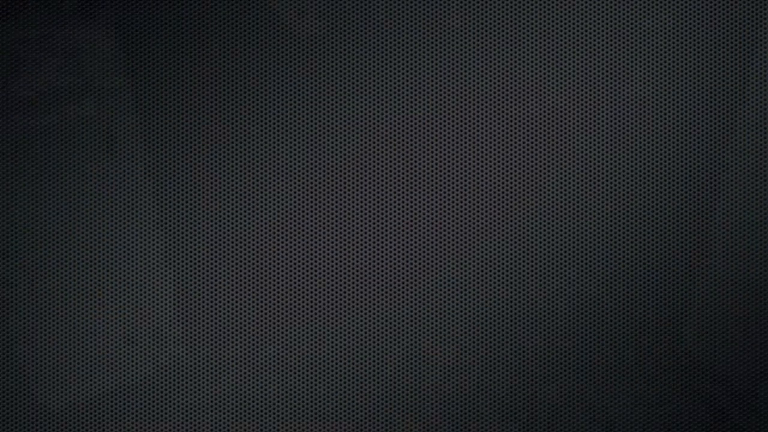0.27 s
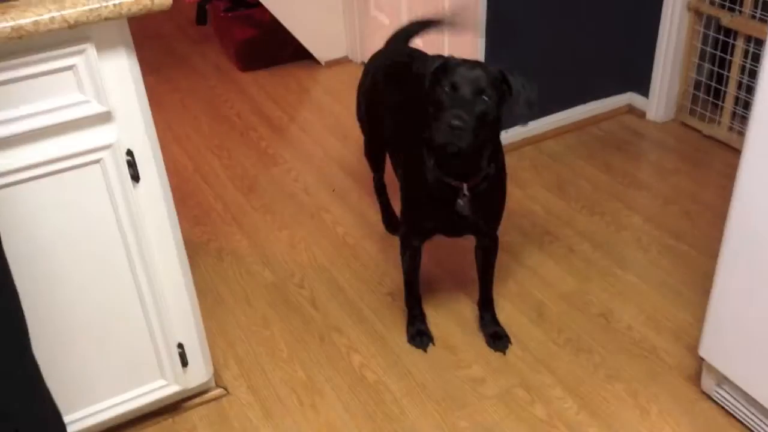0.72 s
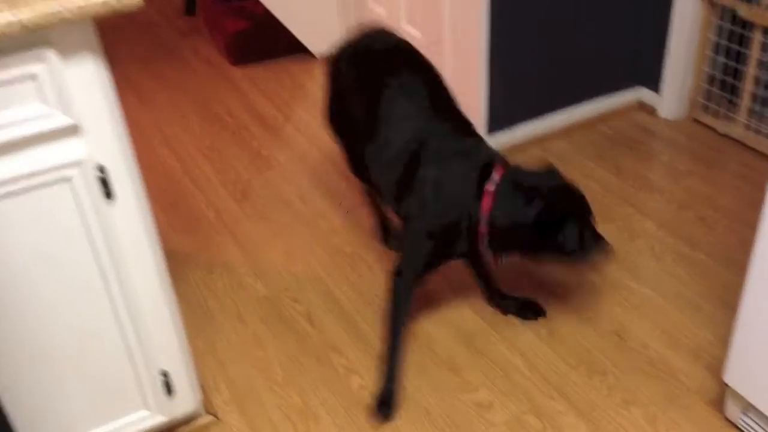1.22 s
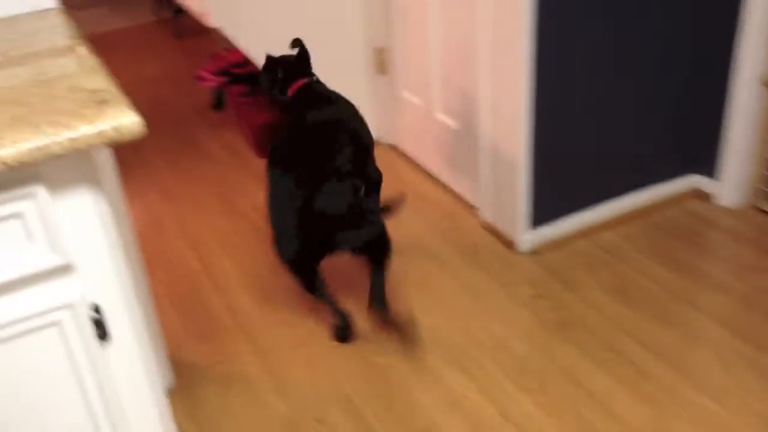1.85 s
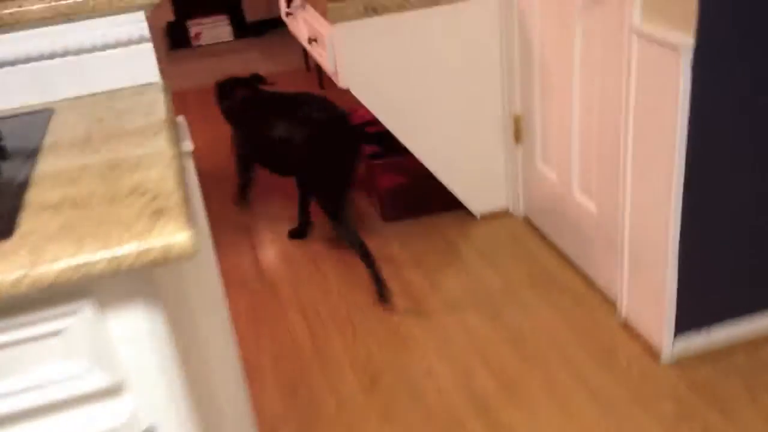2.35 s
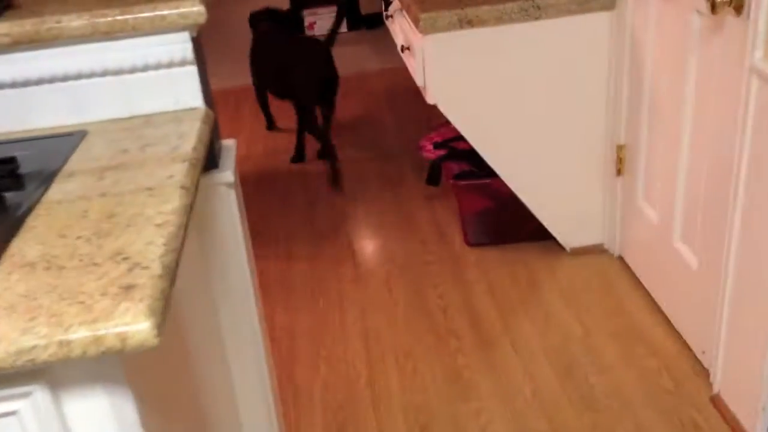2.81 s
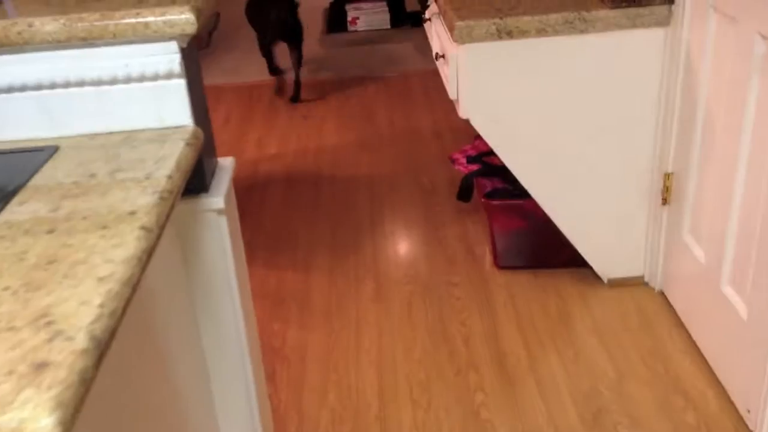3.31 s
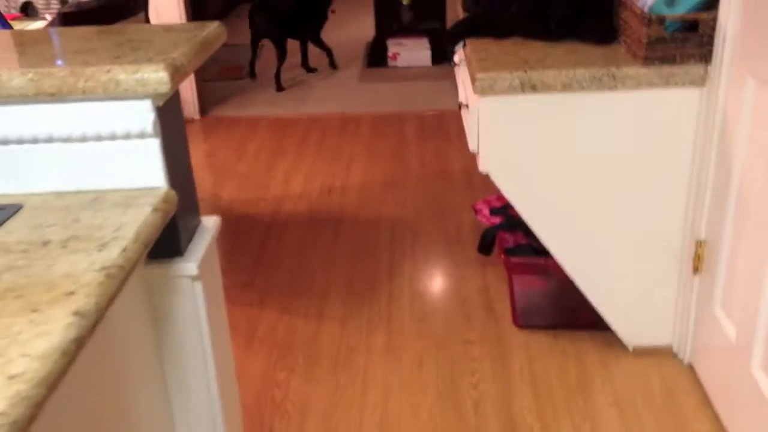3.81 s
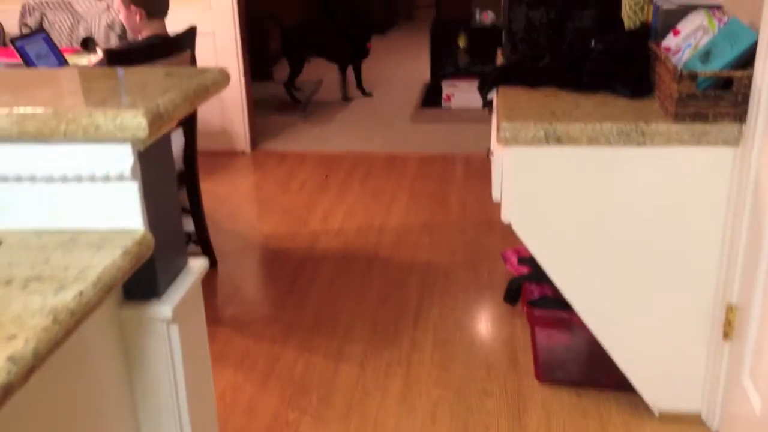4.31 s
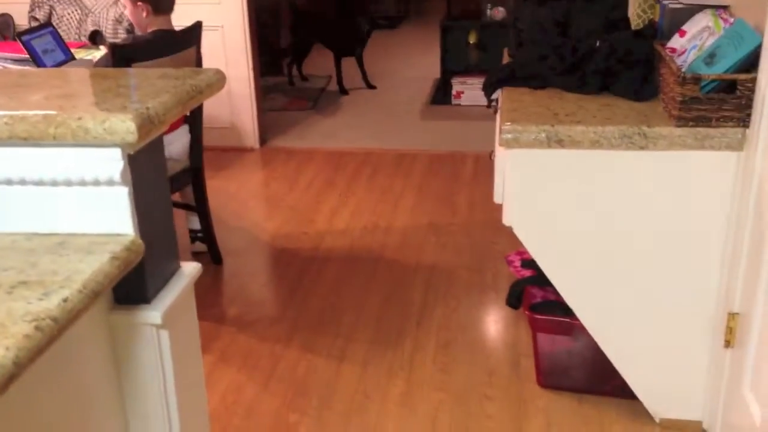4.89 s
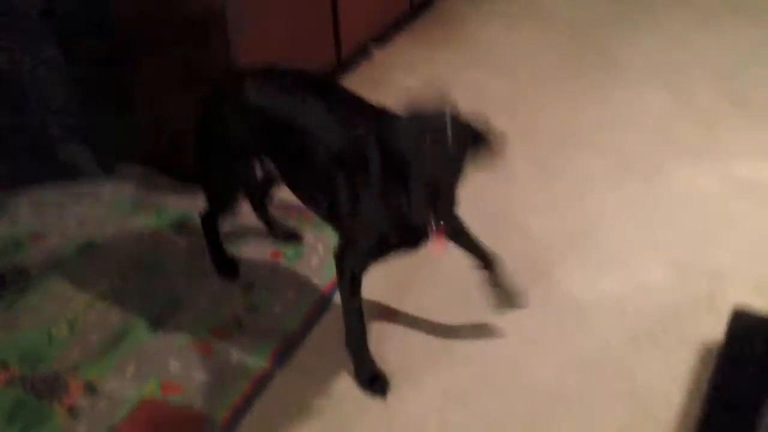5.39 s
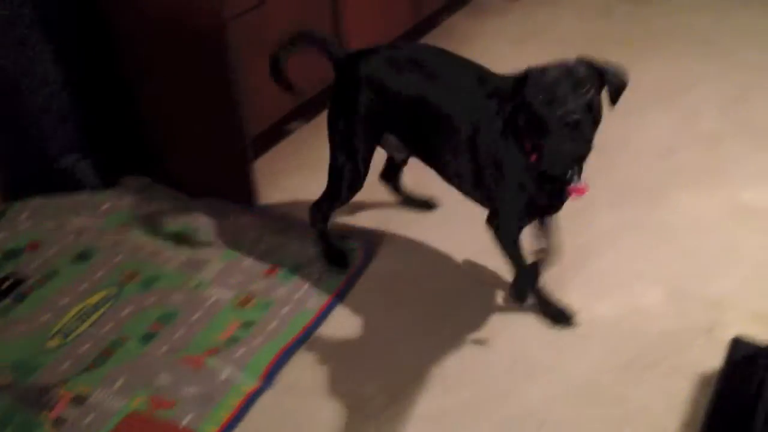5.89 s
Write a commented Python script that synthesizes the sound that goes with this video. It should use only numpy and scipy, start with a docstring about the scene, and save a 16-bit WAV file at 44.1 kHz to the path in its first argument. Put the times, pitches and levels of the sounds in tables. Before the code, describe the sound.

Near silence, then a quick tangle of sound: a large dog's brief closed-mouth woof, hard claw clicks, skids, soft paw thuds and bright metallic tag jingles in a lively kitchen. The footsteps get fainter. Three powerful single barks follow, spaced under a second apart, with room echo, then two shorter, drier barks in a quieter carpeted room, picked up by a simple handheld microphone.

```python
"""Large dog on a hard floor, then on carpet

A dog woofs, spins round in a kitchen and trots off, claws skidding and collar tags clinking; it barks three
times from the next room and twice nearby on carpet. Barks are harmonics and breath noise through throat spectra,
claws and skids shaped noise, pads and tags decaying modes. The rooms ring; a limiter holds down the loud barks."""
import sys
import numpy as np
from scipy import signal
from scipy.io import wavfile
from scipy.ndimage import uniform_filter1d, minimum_filter1d, map_coordinates

SR = 44100
rng = np.random.default_rng(int(sys.argv[2]) if len(sys.argv) > 2 else 0)


def master(y):
    """Save y as 16-bit WAV."""
    cut = np.clip(np.atleast_2d(y).T, -1, 1)
    pcm = np.round(cut * 32767)  # scale
    wavfile.write(sys.argv[1], SR, pcm.astype(np.int16))


N = 271215

# All level columns are relative dB.
# first woof, effort and pitch contour: time_s, effort_db, pitch_hz
WOOF_CONTOUR = [(1.154, -51, 202.8), (1.187, -31.5, 224.3), (1.205, -22.5, 258.8), (1.246, -26.5, 276.8),
                (1.289, -26, 219.6), (1.304, -37, 185), (1.37, -52.5, 160.4)]
# throat and mouth response in the woof: freq_hz, level_db
WOOF_THROAT = [(100, -36.5), (220, -4.5), (520, 3.5), (800, -7), (1060, -3), (1350, -23), (1650, -7),
               (1900, -15), (2200, -4.5), (2700, -9.5), (4000, -17.5), (12000, -43)]
# throat and mouth response in each bark: freq_hz, level_db
THROAT_1 = [(130, -31), (290, -25.5), (420, -9), (530, -3), (690, -9.5), (980, -4.5), (1300, -15.5),
            (2000, -18), (2600, -21.5), (3200, -40.5), (3950, -39), (4700, -48.5), (6200, -42),
            (14000, -65.5)]
THROAT_2 = [(60, -69), (130, -28.5), (250, -33.5), (340, -7), (460, -3), (700, -8.5), (860, -5),
            (1150, -14.5), (1850, -18.5), (2500, -11), (3250, -38.5), (4500, -42.5), (6300, -33.5),
            (14000, -63.5)]
THROAT_3 = [(130, -22.5), (290, -28.5), (460, -11.5), (570, 0), (740, -6.5), (1000, -2.5), (1250, -14),
            (2000, -11.5), (2600, -27), (3500, -33), (5000, -40), (5700, -28), (8300, -44), (14000, -57)]
THROAT_4 = [(130, -28.5), (290, -17.5), (460, -5), (550, -0.5), (700, 1.5), (1030, -1.5), (1350, -16.5),
            (1800, -9.5), (2600, -15.5), (3200, -27), (4900, -36.5), (5800, -24.5), (7300, -36.5),
            (14000, -50)]
THROAT_5 = [(130, -16), (280, -37), (400, 0.5), (580, 4.5), (850, 6), (1150, 0.5), (1400, -13),
            (1720, -3.5), (2700, -14), (3300, -25.5), (4400, -34.5), (5850, -23), (7500, -34), (14000, -48)]
# barks: open_s (mouth fully open), level_db, top_pitch_hz, growl_s (before the rise), growl_db, rise_s, hold_s,
# tail_s, tail_fade_db_per_s, tail_bright_db, rough (0-1), strain_bright_db, chest_hum_db, chest_rasp_db,
# odd_harmonics_db, cheek_ring_db
BARKS = [(3.406, -11, 277.1, .025, -45, 0.068, .073, .115, 159, 7.5, 0.19, 7, -41, -41.5, -4.5, -6),
         (4.208, -13.5, 228.8, 0.018, -43.5, .046, .029, 0.14, 94, -10, 0.6, 6.5, -48, -43, -12, -26),
         (4.876, -10.5, 294.9, .082, -43, .035, .069, 0.12, 150.5, 3, 0.4, 7.5, -40.5, -38.5, -7.5, -20),
         (5.348, -15, 278.9, 0.00302, -40, 0.012, .082, .06, 128, -3.5, 0.22, 6.5, -55.5, -24, -10, 5),
         (6.086, -12, 289.3, 0.0026, -47, .017, 0.057, 0.058, 106, -13, 0.71, 6, -55.5, -49, -4.5, -23)]
# resonances that stand out as the jaws close: freq_hz, width_hz, level_db
CHEEKS = [(1293, 83, 9), (1950, 78, -0.5)]
# chest rasp spectrum: freq_hz, level_db
CHEST_SPECTRUM = [(60, -43), (130, -17), (200, -13), (290, -7), (360, 1), (460, -4.5), (700, -20.5),
                  (3000, -60.5), (15000, -78)]
# footfalls: time_s, claw_db, claw_ring_hz, pad_db, skid_db, skid_half_length_s, tilt_db_per_octave
FOOTFALLS = [(1.1607, -25.5, 4930, -42, -41.5, 0.024, 2.5), (1.2068, -10, 4030, -40, -31.5, 0.014, 6),
             (1.26, -26, 4000, -55, -38, 0.024, 1.5), (1.347, -13, 6030, -33, -31, .014, 1),
             (1.4091, -5, 5650, -20, -32, 0.02, 2.5), (1.548, -12, 3370, -25, -20, .011, -0.5),
             (1.5947, -15.5, 3330, -43, -38, 0.012, 2), (1.6535, -8.5, 7440, -29.5, -29, 0.023, 1.5),
             (1.755, -35, 4000, -52, -36.5, 0.056, 2.5), (1.8596, -17, 3870, -66, -32, 0.012, 0),
             (1.89, -38, 4000, -69, -33.5, 0.0092, -3.5), (2.0332, -16, 4170, -32, -36, 0.027, 1.5),
             (2.169, -56, 4000, -41.5, -46, 0.017, -6.5), (2.206, -44, 4000, -42.5, -33, 0.021, 3),
             (2.36, -34, 4000, -47.5, -45.5, 0.015, -3), (2.47, -23.5, 4400, -49, -42.5, 0.02, 1),
             (2.572, -33, 2840, -48, -54.5, .01, -1.5), (2.615, -36, 4000, -65, -40.5, 0.033, 0),
             (2.669, -25, 4040, -31.5, -42.5, 0.022, 1.5), (2.824, -39, 3920, -64, -55, 0.011, 1),
             (2.8778, -19, 3800, -53.5, -39.5, 0.022, 2), (3.074, -32, 3540, -58, -43, 0.0072, 1.5),
             (3.093, -24.5, 3700, -60.5, -35.5, 0.012, 2), (3.301, -28, 3800, -49, -38, 0.011, 2)]
# claw and skid spectrum: freq_hz, level_db
CLAW_SPECTRUM = [(59, -59), (100, -44), (213, -17), (408, -14.5), (493, -9.5), (676, -14.5), (926, -19.5),
                 (1270, -16), (1570, -16.5), (3480, -2), (4110, -4), (9130, -15), (15100, -32)]
# floor board modes: freq_hz, level_db, t60_s
BOARD_MODES = [(186, -8.5, 0.072), (307, 2.5, 0.016), (382, -0.5, 0.031), (525, 8.5, 0.017),
               (586, -3.5, 0.024), (670, -17, 0.032)]
# collar tag clinks: time_s, level_db, tilt_db_per_octave
CLINKS = [(0.4984, -50, -15), (1.506, -30.5, -7.5), (1.6703, -14.5, 4.5), (1.7004, -20, 8.5),
          (1.7837, -26, -12), (1.7966, -20.5, -9), (1.943, -36.5, 4), (1.9925, -25.5, -19.5),
          (2.1734, -27.5, -1), (2.438, -47, -11), (2.559, -49, 15), (2.653, -38.5, 1), (2.845, -37, -8),
          (3.2809, -44.5, -2.5), (3.4191, -42.5, 2.5), (3.5507, -46, -9), (3.921, -49.5, 2),
          (4.0894, -38, -6), (4.374, -51.5, 13), (5.0332, -54, 2.5), (5.124, -67, 8.5), (5.2674, -58, -13),
          (5.471, -59, -2), (5.7864, -54.5, 1.5), (5.908, -50, 0.5), (5.937, -31, 4)]
# collar tag modes: freq_hz (nominal), level_db, t60_s
TAG_MODES = [(5590, -15, 0.38), (8660, -13.5, 0.18), (8860, 6, 0.092), (9100, -17.5, 0.11),
             (12900, -8, 0.084), (14000, -6.5, 0.074)]
# paws and coat brushing about: time_s, level_db, half_length_s, tilt_db_per_octave
SHUFFLES = [(.64, -59, 0.0043, -5), (.745, -61, 0.025, 3), (.832, -62, 0.0046, 0), (1.11, -53.5, 0.029, 3),
            (4.1, -63, 0.023, -10.5), (4.67, -56.5, 0.061, 1), (5.85, -71.5, 0.097, 1.5),
            (6.03, -59, 0.033, -1.5)]
# brushing spectrum: freq_hz, level_db
SHUFFLE_SPECTRUM = [(59, -48.5), (100, -15), (182, -15), (728, -4), (824, -1.5), (1120, -8.5), (1960, -9.5),
                    (2180, -8.5), (14000, -29.5)]
# room tone spectrum: freq_hz, level_db
HUSH_SPECTRUM = [(18, -65.5), (30, -35.5), (64, -28), (105, -1.5), (186, 4.5), (356, -2), (462, -3.5),
                 (840, -8.5), (1410, -17.5), (2320, -11.5), (8750, -16.5), (15100, -24)]
# room decay before each room's own scaling: freq_hz, t60_s
ROOM_T60 = [(120, 0.18), (400, 0.39), (1000, 0.47), (3000, 0.44), (7000, 0.33), (14000, 0.36)]

# growl
GROWL_HZ, GROWL_SWELL_DB, GROWL_ROUGH, GROWL_MOUTH, GROWL_BRIGHT_DB = 195.4, 15.5, .75, .8, -9
# pitch as a share of the top pitch: on opening, after the hold, at the very end
SCOOP, SAG, SAG_END = 0.9, .925, .87
# shares of the rise still to go when the pitch has leapt up, and when the upper resonances begin to open
BREAK_LEAD, DULL_LEAD = .55, 1
# after the hold the voice drops, then trails off
DROP_S, DROP_DB, DROP_BRIGHT_DB, TAIL_ROUGH, TAIL_MOUTH = .011, 11, 1, 0.39, 0.75
OPEN_BRIGHT_DB, HELD_BRIGHT_DB, HELD_ROUGH = -2, -3.5, 0.22
# mid-bark the voice cracks: rougher, brighter, a little weaker; brightness outlasts roughness (shape < 1)
STRAIN_ROUGH, STRAIN_DIP_DB, PRESS_SHAPE = .5, 3, 0.72
# unsteady effort, pitch (share) and mouth (factor)
FLUTTER_DB, FLUTTER_HZ, WOBBLE, MOUTH_SHAKE = 1.93, 75.5, .008, 0.0083
# factors on the throat resonances
OPEN_MOUTH, HELD_MOUTH, DROP_MOUTH = 0.98, 1.013, 1
RASP_WIDTH = 0.61  # half length, share of the rise
CLAW_RING_OCTAVES = .55
TOE_GAP_S, TOE_DB, TOE_TILT_DB = .0075, -5.5, -3.5  # second claw: later, weaker, duller
SKID_LAG = .85  # skid peak after landing, in half lengths
JINGLE_COUNT, JINGLE_DB, JINGLE_SPREAD_DB = 8, -66.5, 6.5  # faint tag touches at random times
KITCHEN_HUSH_DB, CARPET_HUSH_DB = -65, -74.5
FADE_IN_S, FADE_IN_DB_PER_S, CARPET_FROM_S, CROSSFADE_S = 0.5, 132, 5, 1
EDGE_HZ = 15400  # upper band limit


def bark(row, throat):
    """A growl swells, the mouth opens with a chesty rasp, the voice strains in the hold, drops and trails off."""
    (open_s, level_db, top_hz, growl_s, growl_db, rise_s, hold_s, tail_s, fade_db_per_s, tail_bright_db,
     rough, strain_bright_db, chest_db, rasp_db, odd_db, cheek_db) = row
    rise_from_s = open_s - rise_s
    release_s = open_s + hold_s
    drop_s = release_s + DROP_S
    end_s = release_s + tail_s
    stages = [rise_from_s - growl_s, rise_from_s, open_s, release_s, drop_s, end_s]
    t = np.arange(round(stages[0] * SR), round(end_s * SR)) / SR

    strain = np.sin(np.pi * np.clip((t - open_s) / hold_s, 0, 1)) ** 2
    pressed = strain ** PRESS_SHAPE

    dropped_db = level_db - DROP_DB
    effort_db = np.interp(t, stages, [growl_db - GROWL_SWELL_DB, growl_db, level_db, level_db,
                                      dropped_db, dropped_db - fade_db_per_s * tail_s])
    effort_db += FLUTTER_DB * waver(len(t), FLUTTER_HZ) - STRAIN_DIP_DB * strain

    pitch_hz = np.interp(t, [rise_from_s, open_s - BREAK_LEAD * rise_s, open_s + hold_s / 2, drop_s, end_s],
                         [GROWL_HZ, SCOOP * top_hz, top_hz, SAG * top_hz, SAG_END * top_hz])
    pitch_hz *= 1 + WOBBLE * waver(len(t), FLUTTER_HZ)

    hoarse = np.interp(t, stages, [GROWL_ROUGH, GROWL_ROUGH, rough, HELD_ROUGH, TAIL_ROUGH, TAIL_ROUGH])
    hoarse += STRAIN_ROUGH * strain
    mouth = np.interp(t, stages, [GROWL_MOUTH, GROWL_MOUTH, OPEN_MOUTH, HELD_MOUTH, DROP_MOUTH, TAIL_MOUTH])
    mouth += MOUTH_SHAKE * waver(len(t), FLUTTER_HZ)
    bright_db = np.interp(t, [open_s - DULL_LEAD * rise_s, *stages[2:]],
                          [GROWL_BRIGHT_DB, OPEN_BRIGHT_DB, HELD_BRIGHT_DB,
                           tail_bright_db + DROP_BRIGHT_DB, tail_bright_db])
    bright_db += strain_bright_db * pressed

    sound = voice(t, effort_db, pitch_hz, hoarse, mouth, bright_db, throat, chest_db, odd_db)
    rasp = rub([(open_s, rasp_db, RASP_WIDTH * rise_s, 0)], CHEST_SPECTRUM, slips_per_s=610, slip_share=0.067)
    return closing(sound, release_s, cheek_db) + rasp


def woof(shut_s=1.252, shut_time_s=0.021, muffle_hz=300, hum_db=8, leak_db=-11, rough=0.14, shut_mouth=0.57,
         open_bright_db=4.0, shut_bright_db=-5):
    """The jaws close midway through the first woof: resonances fall and a low-passed, falling hum remains."""
    s, effort_db, pitch_hz = np.transpose(WOOF_CONTOUR)
    at = np.arange(round(s[0] * SR), round(s[-1] * SR))
    t = at / SR
    shut = .5 + .5 * np.tanh((np.arange(N) / SR - shut_s) / shut_time_s)
    mouth = 1 + (shut_mouth - 1) * shut[at]
    bright_db = open_bright_db + (shut_bright_db - open_bright_db) * shut[at]
    sound = voice(t, np.interp(t, s, effort_db), np.interp(t, s, pitch_hz), rough, mouth, bright_db,
                  WOOF_THROAT, chest_db=-50.0, odd_db=-2.0)
    hum = signal.sosfilt(signal.butter(4, muffle_hz, fs=SR, output="sos"), sound)
    muffled = gain_of(hum_db) * hum + gain_of(leak_db) * sound
    return (1 - shut) * sound + shut * muffled


def voice(t, effort_db, pitch_hz, rough, mouth, bright_db, throat, chest_db, odd_db, jitter=.055,
          rough_above_hz=1900, shimmer=1.0, air_db=-2, bright_hz=1250, lead_in_s=0.098, chaos=2.6):
    """Unsteady vocal folds and puffs of air sound the throat; the chest hums as the bark gathers."""
    rough = np.clip(rough, .01, .95)
    turns = np.cumsum(pitch_hz * (1 + jitter * rough * waver(len(t), 500))) / SR
    # the folds close twice a cycle, so even harmonics lead; hoarseness makes the two closures drift apart
    slip = chaos * rough * waver(len(t), 170)
    folds = np.zeros(len(t))
    for k in range(1, 26):
        odd = k % 2
        harmonic = np.cos(2 * np.pi * k * turns + slip * odd)
        folds += gain_of(odd_db * odd) * harmonic / np.hypot(1, k * pitch_hz / rough_above_hz)
    folds *= np.sqrt(6 * pitch_hz / SR) * (1 + shimmer * rough * waver(len(t), 260))

    puff_shape = 1.0 + np.exp(-(turns % 1) / 0.25)
    puffs = gain_of(air_db) * evened(puff_shape * rng.standard_normal(SR)[:len(t)])
    puffs = signal.lfilter(*signal.butter(1, 650, "high", fs=SR), puffs)
    sound = throat_filter(np.sqrt(1 - rough) * folds + np.sqrt(rough) * puffs, throat, mouth)

    # brightness scales the upper resonances
    dull = signal.filtfilt(*signal.butter(2, bright_hz, fs=SR), sound)
    sound = dull + (sound - dull) * gain_of(bright_db)
    # level the running rms so that effort alone sets the envelope
    sound /= np.sqrt(abs(uniform_filter1d(sound ** 2, size=500)) + 1e-12)

    chest = np.sin(2 * np.pi * turns) * gain_of(np.minimum(effort_db, chest_db))
    chest /= 1 + ((t - t[0]) / lead_in_s) ** 4
    out = np.zeros(N)
    add(out, t[0], (gain_of(effort_db) * sound + 2 * chest) * signal.windows.tukey(len(t), .03))
    return out


def throat_filter(x, throat, mouth):
    """All resonances slide together with the mouth: stretch time, filter, stretch back."""
    clock = np.cumsum(np.clip(mouth, .4, 1.6))
    index = np.arange(len(x))
    stretched = map_coordinates(x, [np.interp(np.arange(clock[-1] + 2), clock, index)])
    return map_coordinates(colour(stretched, throat), [clock])


def closing(x, from_s, level_db, glide_s=0.0072):
    """Late in a bark the jaws narrow and the cheek resonances come forward."""
    narrow = .5 + .5 * np.tanh((np.arange(N) / SR - from_s) / glide_s)
    ring = np.zeros(N)
    for hz, width_hz, db in CHEEKS:
        ring += gain_of(db) * signal.lfilter(*signal.iirpeak(hz, hz / width_hz, fs=SR), x * narrow)
    return x + gain_of(level_db) * ring


def claws(level_db=-4, decay_s=0.0057, crack_db=3, crack_decay_s=0.0014, vary_db=3.5, ring_db=6):
    """Two claws strike at each footfall: a hard crack and a short scratch around a broad resonance."""
    out, t = np.zeros(N), np.arange(SR // 16) / SR
    hz = np.geomspace(60, 16000, num=48)
    envelope = (np.exp(-t / decay_s) + gain_of(crack_db) * np.exp(-t / crack_decay_s)) / 2
    for s, db, ring_hz, _, _, _, tilt_db in FOOTFALLS:
        ring = ring_db * np.exp(-.5 * (np.log2(hz / ring_hz) / CLAW_RING_OCTAVES) ** 2)
        for toe in range(2):
            tick = rng.standard_normal(len(t)) * envelope
            strike_db = read(CLAW_SPECTRUM, hz) + ring + vary_db * rng.standard_normal(len(hz))
            tick = colour(tick, np.transpose([hz, strike_db]), tilt_db + toe * TOE_TILT_DB)
            add(out, s + toe * TOE_GAP_S, gain_of(db + level_db + toe * TOE_DB) * tick)
    return out


def skids():
    """After each landing the claws slide a little on the hard floor."""
    strokes = [(s + SKID_LAG * half_s, db, half_s, tilt_db) for s, _, _, _, db, half_s, tilt_db in FOOTFALLS]
    return rub(strokes, CLAW_SPECTRUM, slips_per_s=700, slip_share=0.61)


def rub(strokes, spectrum, slips_per_s, slip_share):
    """Strokes of friction: a swell of fine grain with separate little slips (slip_share of the energy)."""
    out, t = np.zeros(N), np.arange(SR // 2) / SR - 1 / 4
    for s, db, half_s, tilt_db in strokes:
        slips = evened(rng.standard_normal(len(t)) * (rng.random(len(t)) < slips_per_s / SR))
        grain = np.sqrt(slip_share) * slips + np.sqrt(1 - slip_share) * rng.standard_normal(len(t))
        swell = np.exp(-.5 * (t / half_s) ** 2)
        add(out, s + t[0], gain_of(db) * colour(grain * swell, spectrum, tilt_db))
    return out


def paws(level_db=6, push_s=0.009, lowest_hz=210):
    """Soft pads thump the floor boards: noise bursts excite decaying modes, with little deep bass."""
    out, t = np.zeros(N), np.arange(SR // 5) / SR
    ring = sum(gain_of(db - 60 * t / t60_s) * np.sin(2 * np.pi * hz * t) for hz, db, t60_s in BOARD_MODES)
    for s, _, _, db, _, _, _ in FOOTFALLS:
        thump = signal.fftconvolve(rng.standard_normal(len(t)) * np.exp(-t / push_s), ring)
        add(out, s, gain_of(db + level_db) * thump / abs(thump).max())
    return signal.sosfilt(signal.butter(3, lowest_hz, "high", fs=SR, output="sos"), out)


def tags(level_db=-2, tick_db=-2, tick_decay_s=0.0045, vary_db=2, rebound_db=-11, rebound_time_s=0.047):
    """Metal tags knock together and rebound: ticks, then thin high modes, weighted anew by each blow."""
    out, t = np.zeros(N), np.arange(SR // 4) / SR
    hz, mode_db, t60_s = np.transpose(TAG_MODES)[:, :, None]
    touches = []
    for when, size in rng.random((JINGLE_COUNT, 2)):
        touch_s = FADE_IN_S + when * (N / SR - FADE_IN_S)
        touches.append((touch_s, JINGLE_DB + JINGLE_SPREAD_DB * (2 * size - 1), 0))
    for s, db, tilt_db in CLINKS + touches:
        weight = gain_of(mode_db + tilt_db * np.log2(hz) + vary_db * rng.standard_normal(hz.shape))
        # tags that lean on each other ring slightly off pitch
        pitch_hz = hz * (1 + .003 * rng.standard_normal(hz.shape))
        modes = np.sin(2 * np.pi * (pitch_hz * t + rng.random(hz.shape)))
        ring = weight * gain_of(-60 * t / t60_s) * modes
        tick = gain_of(tick_db) * np.exp(-t / tick_decay_s) * np.diff(rng.standard_normal(len(t) + 1)) / 2
        clink = gain_of(db + level_db) * (ring.sum(0) / np.linalg.norm(weight) + tick)
        add(out, s, clink)
        for delay_s in rebound_time_s * rng.random(size=2):
            add(out, s + delay_s, gain_of(rebound_db) * clink)
    return out


def room(x, wet_db, gap_s=.005, ring=0.92):
    """Direct sound plus dense wall reflections, each band dying at its own speed; ring scales the decay time."""
    taps = rng.choice([-1., 1.], SR) * (rng.random(SR) < .1) * (np.arange(SR) > gap_s * SR)
    hz, t, bands = signal.stft(taps, SR, nperseg=256)
    decay = gain_of(-60 * t / (ring * read(ROOM_T60, hz))[:, None])
    tail = signal.istft(bands * decay, SR, nperseg=256)[1]
    wet = signal.fftconvolve(x, tail / np.linalg.norm(tail))[:N]
    return (x + gain_of(wet_db) * wet) / np.hypot(1, gain_of(wet_db))


def hush():
    """Faint room tone, spectrally shaped noise, fades in; the carpeted room is quieter than the kitchen."""
    t = np.arange(N) / SR
    db = np.interp(t, [CARPET_FROM_S, CARPET_FROM_S + CROSSFADE_S], [KITCHEN_HUSH_DB, CARPET_HUSH_DB])
    db -= FADE_IN_DB_PER_S * np.maximum(FADE_IN_S - t, 0)
    return gain_of(db) * colour(rng.standard_normal(N), HUSH_SPECTRUM)


def gain_of(db):
    """Decibels to amplitude."""
    return 10 ** (np.asarray(db) / 20)


def evened(x):
    """Scales to rms 1."""
    return x / np.sqrt(np.mean(x ** 2) + 1e-20)


def read(points, hz):
    """A spectrum, joined by straight lines over log frequency."""
    f, value = np.transpose(points)
    return np.interp(np.log(hz + 1), np.log(f + 1), value)


def add(mix, s, sound):
    """Lays a sound into the mix at time s."""
    part = mix[round(s * SR):][:len(sound)]
    part += sound[:len(part)]


def colour(x, points, tilt_db=0, size=4096):
    """Causal minimum-phase filter of unit energy with the given spectrum, tilted per octave above 500 Hz."""
    hz = abs(np.fft.fftfreq(size, 1 / SR))
    log_gain = np.log(gain_of(read(points, hz) + tilt_db * np.log2(np.maximum(hz, 500))))
    taps = np.fft.ifft(np.exp(np.conj(signal.hilbert(log_gain)))).real[:size // 2]
    return signal.fftconvolve(x, taps / np.linalg.norm(taps))[:len(x)]


def waver(count, hz):
    """Random values of unit size, hz a second, joined by straight lines."""
    return np.interp(np.arange(count) * hz / SR, np.arange(SR // 8), rng.standard_normal(SR // 8))


def scene():
    """Each place in the house adds its own share of room sound."""
    throats = [THROAT_1, THROAT_2, THROAT_3, THROAT_4, THROAT_5]
    barks = [bark(row, throat) for row, throat in zip(BARKS, throats)]
    next_room = room(sum(barks[:3]), wet_db=-5, ring=0.84)
    carpet = room(sum(barks[3:]), wet_db=-8, ring=0.93)
    feet = claws() + skids() + rub(SHUFFLES, SHUFFLE_SPECTRUM, slips_per_s=1200, slip_share=0.27)
    kitchen = room(woof(), wet_db=-2.5, ring=0.86)
    kitchen += room(feet, wet_db=-3.5, ring=1.0) + room(paws(), wet_db=-0.5, ring=1.0)
    kitchen += room(tags(), wet_db=-4.0, ring=0.8)
    return (kitchen + next_room + carpet + hush())[None]


def record(dry, drive_db=1, out_db=1, ceiling=0.85, knee=3.3, lopsided=0.0075):
    """Bass cut, fast limiter that levels the loudest barks, slight lopsided distortion, band limit."""
    x = gain_of(drive_db) * signal.sosfilt(signal.butter(3, 130, "high", fs=SR, output="sos"), dry)
    peak = uniform_filter1d(-minimum_filter1d(-abs(x), size=300), size=300)
    x = x / (1 + abs(peak / ceiling) ** knee) ** (1 / knee)
    x = gain_of(out_db) * (x + lopsided * x ** 2)
    low_pass = signal.firwin(511, EDGE_HZ, window=("kaiser", 9), fs=SR)
    return signal.oaconvolve(x, low_pass[None], "same")


dry = scene()
out = record(dry)
master(out)
```